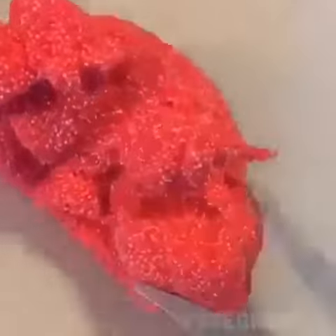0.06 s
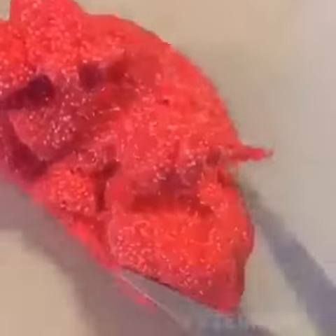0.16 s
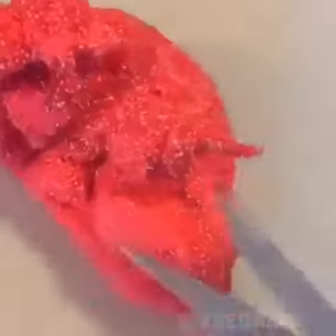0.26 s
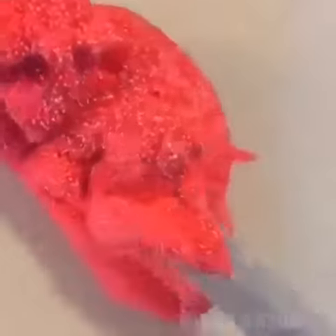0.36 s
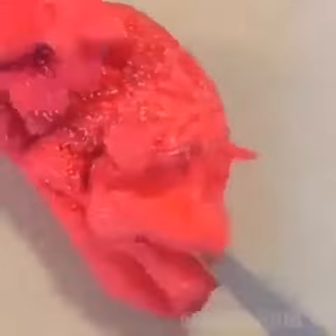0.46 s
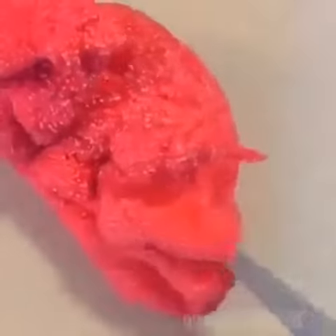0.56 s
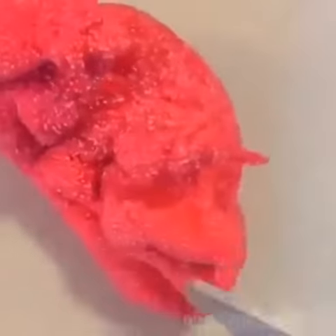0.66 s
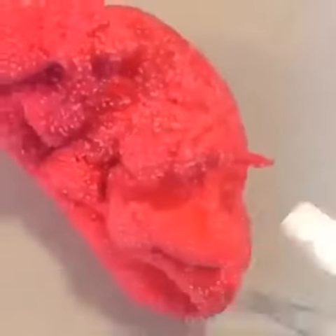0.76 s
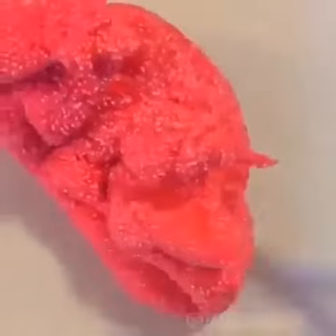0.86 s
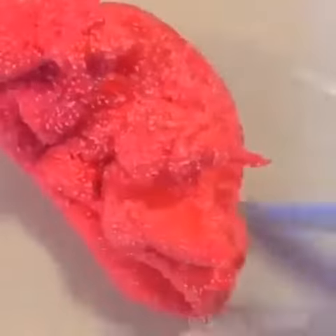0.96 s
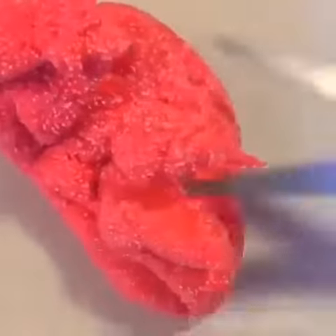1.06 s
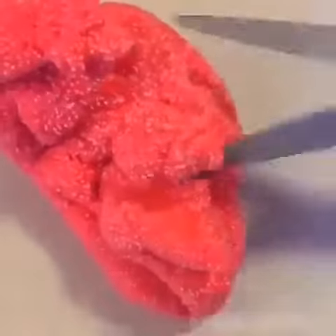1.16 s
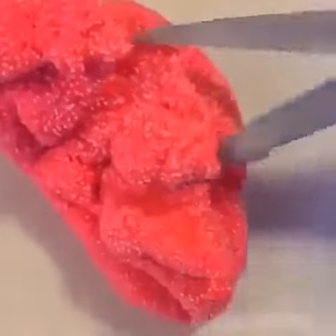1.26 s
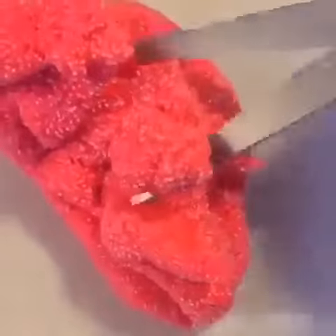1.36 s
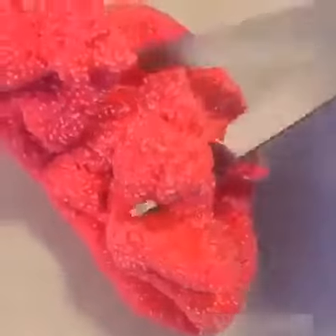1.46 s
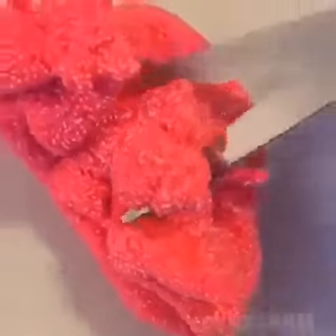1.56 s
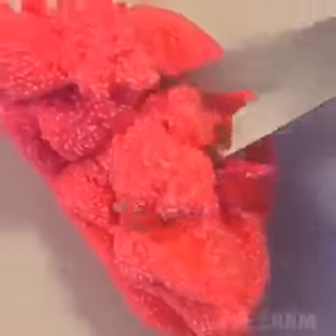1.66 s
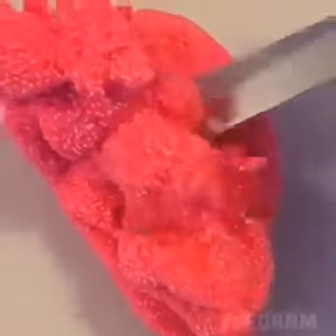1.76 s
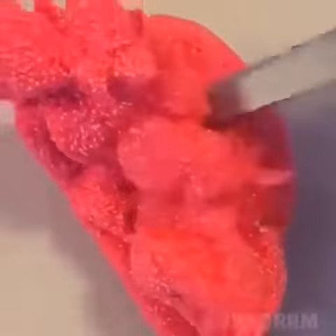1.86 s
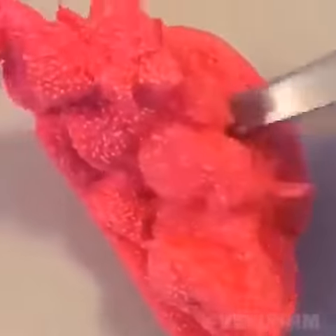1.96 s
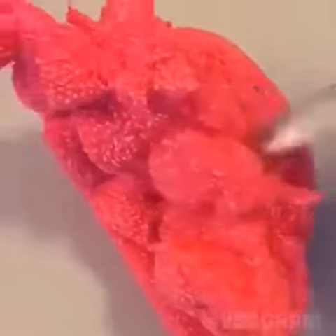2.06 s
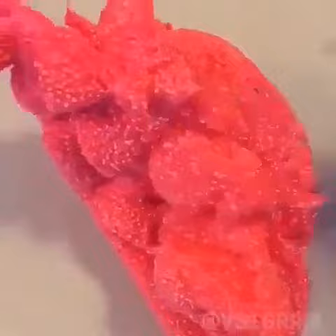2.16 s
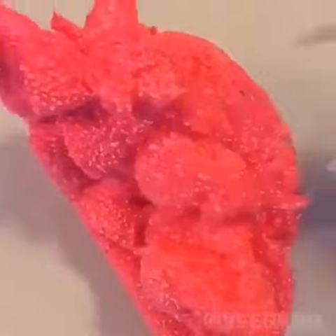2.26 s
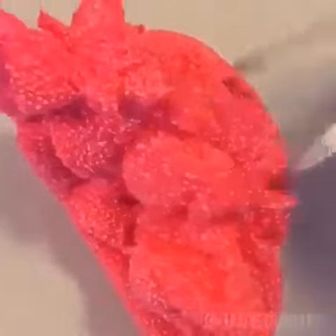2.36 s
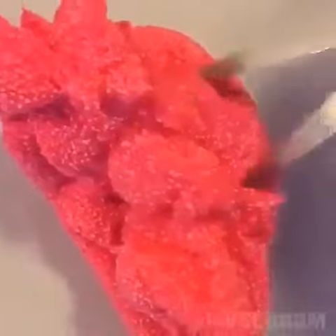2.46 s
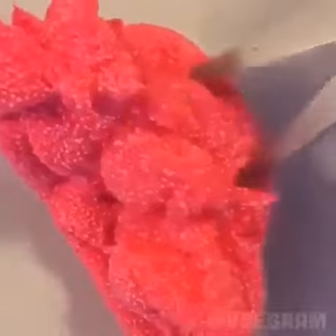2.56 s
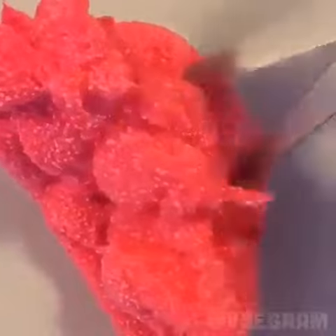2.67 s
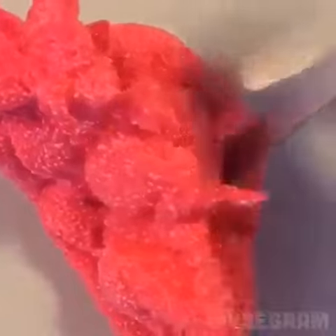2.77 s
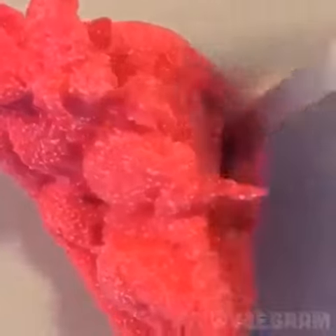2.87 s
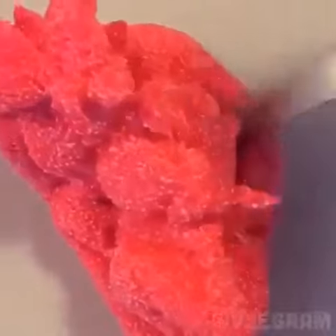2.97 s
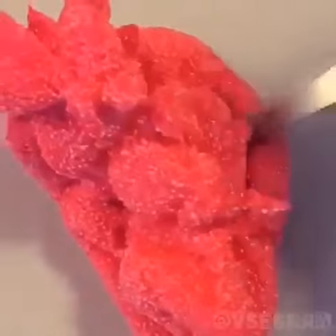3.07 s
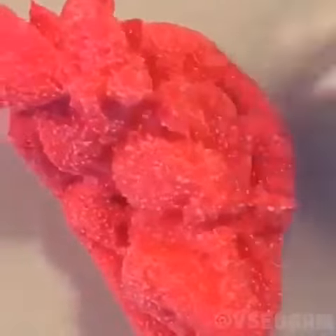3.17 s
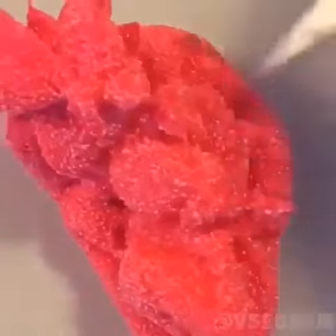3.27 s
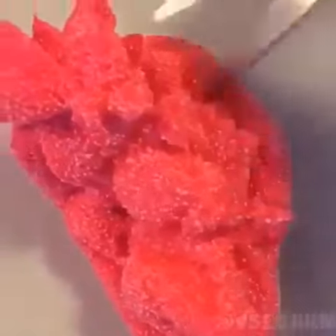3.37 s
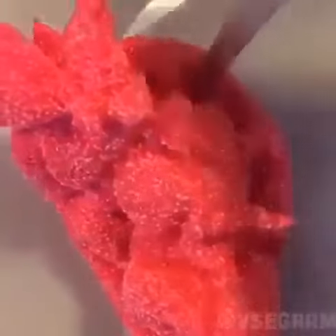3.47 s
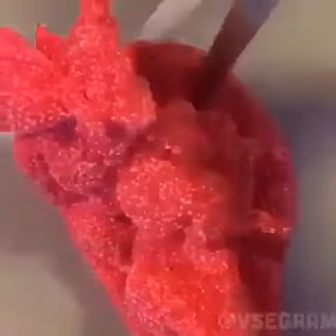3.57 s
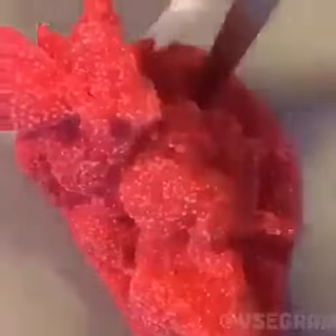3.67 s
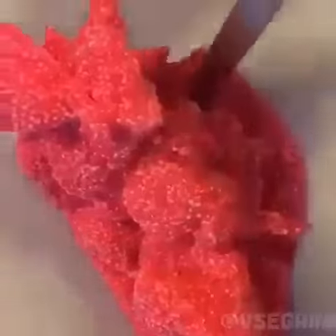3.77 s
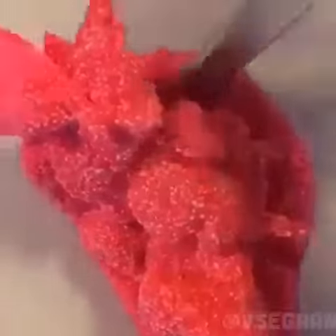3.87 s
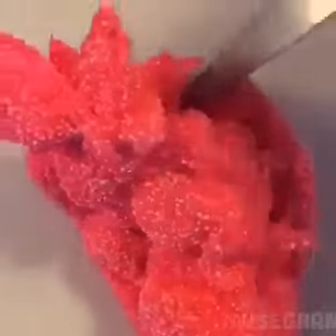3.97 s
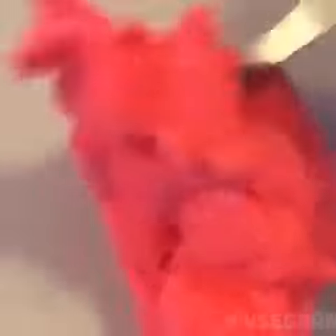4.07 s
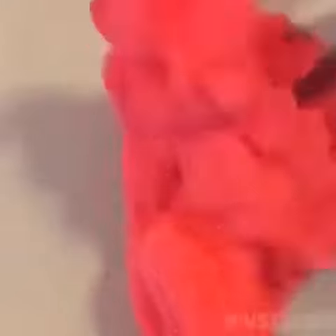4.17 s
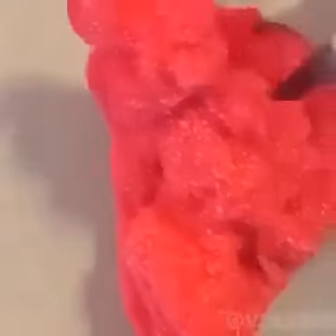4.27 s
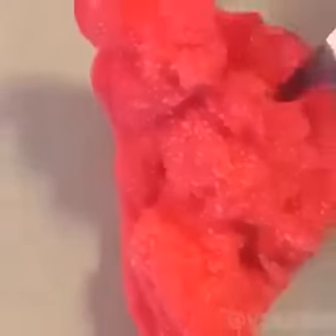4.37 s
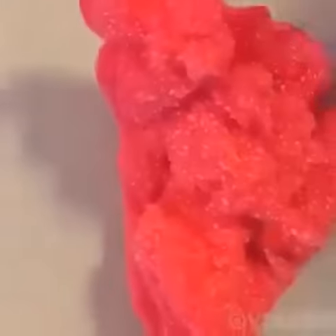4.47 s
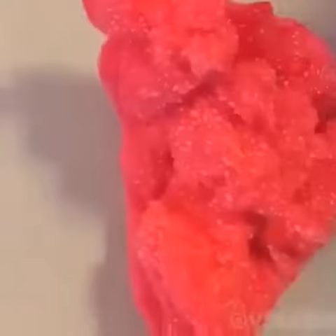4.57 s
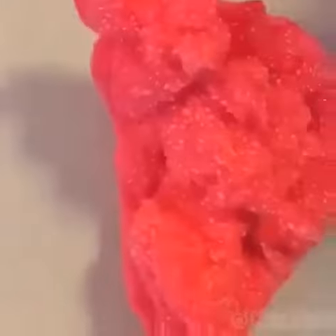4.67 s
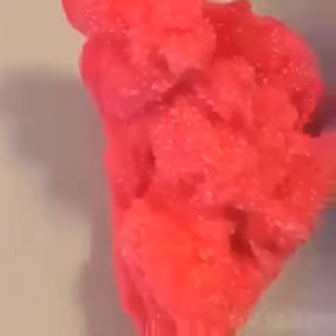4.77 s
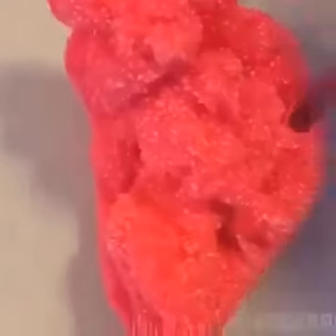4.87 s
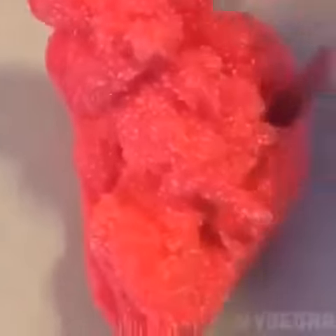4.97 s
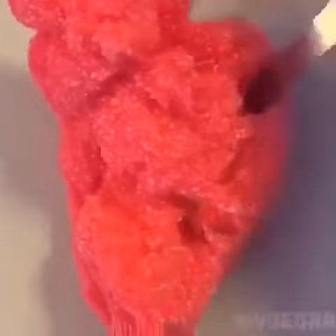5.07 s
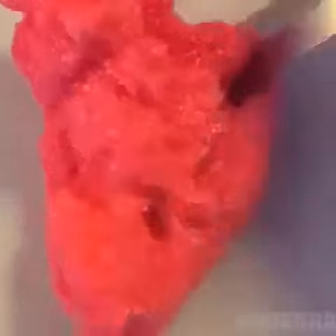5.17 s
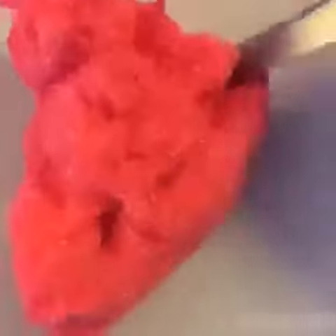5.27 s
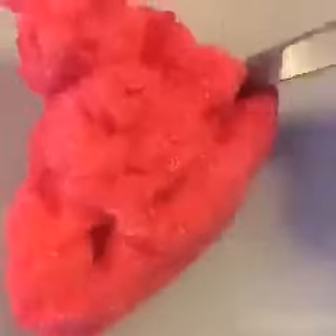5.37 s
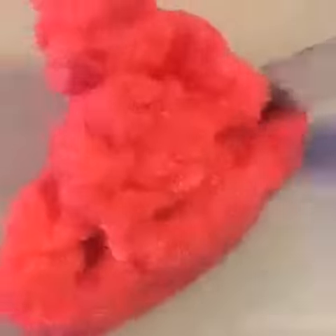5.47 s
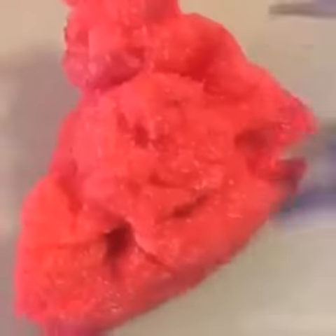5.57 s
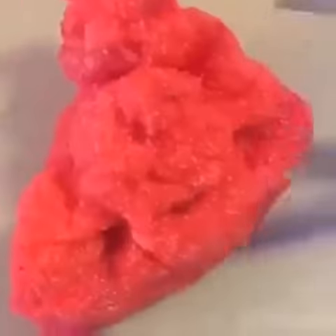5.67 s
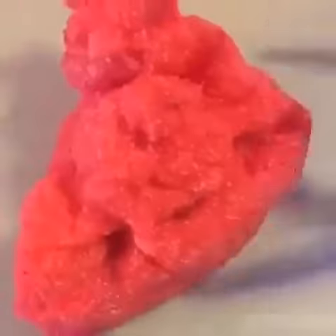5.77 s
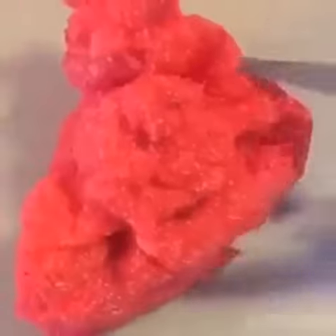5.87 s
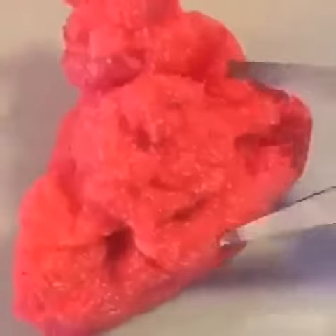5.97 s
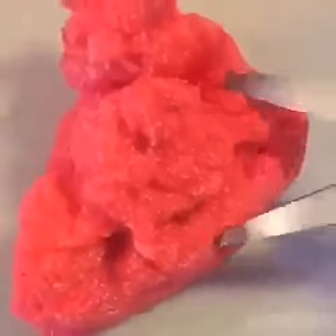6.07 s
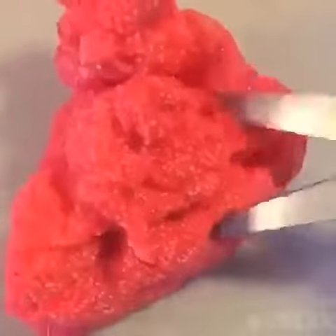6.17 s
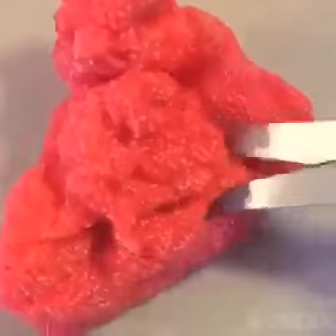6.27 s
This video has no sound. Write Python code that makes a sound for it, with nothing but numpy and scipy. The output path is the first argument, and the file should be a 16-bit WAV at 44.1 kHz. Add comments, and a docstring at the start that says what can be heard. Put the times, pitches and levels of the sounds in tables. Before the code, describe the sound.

Five sharp scissor snips, unevenly spaced over about six seconds, the first two loudest and the last softest. Fine tearing and blade rasp lead into each snap; light scrapes, steel ticks, short clinks on a hard table and dull handling bumps fill the gaps. The microphone is close, the room small with almost no echo, and a quiet low air rumble with faint hum runs throughout.

```python
"""A small room, close to the microphone: metal scissors make five cuts through a soft spongy lump.
Blade rasp is noise made of micro-slips; crushing is thousands of short rings from tearing cells.
Snaps and catches are noise bursts ringing blade resonances; knocks ring the modes of a hard surface.
Ventilation rumble, shaped noise, and a faint hum of three wavering tones run underneath."""
import sys
import numpy as np
from scipy import signal
from scipy.fft import rfft, irfft, next_fast_len
from scipy.io import wavfile
from scipy.ndimage import uniform_filter1d, map_coordinates

SR = 44100
rng = np.random.default_rng(int(sys.argv[2]) if len(sys.argv) > 2 else 0)


def dump_mix(stems):
    """Bounce the given channels to the path in sys.argv[1] as a 16-bit WAV at rate SR."""
    frames = np.atleast_2d(stems).T  # one column per channel
    limited = np.clip(frames, -1, 1)  # hard clip at full scale
    pcm = np.round(limited * 32767).astype(np.int16)
    wavfile.write(sys.argv[1], SR, pcm)


N = 278712
TIME = np.arange(N) / SR  # seconds


def undb(db):
    """Decibels to gain."""
    return 10 ** (np.asarray(db) / 20)


def unit(x):
    """Scale to rms 1."""
    return x / np.sqrt(np.mean(x ** 2))


def peak_unit(x, size=66):
    """Scale a hit so that its loudest stretch of size samples has rms 1."""
    return x / np.sqrt(uniform_filter1d(x ** 2, size).max())


def add(out, start_s, x):
    """Mix x into out at start_s."""
    i = int(start_s * SR)
    out[i:i + len(x)] += x[:N - i]


def colour(x, points):
    """Shape x by a (Hz, dB) spectrum, straight lines over log frequency."""
    hz, db = np.transpose(points)
    f = np.maximum(np.fft.rfftfreq(len(x), 1 / SR), 1)
    gain = undb(np.interp(np.log(f), np.log(hz), db))
    return irfft(rfft(x) * gain, len(x))


def resonate(x, hz, width_hz):
    """One resonance, gain 1 at its centre."""
    return signal.lfilter(*signal.iirpeak(hz, hz / width_hz, fs=SR), x)


def sine(hz, t):
    """Sine wave from phase zero."""
    return np.sin(2 * np.pi * hz * t)


def walk(rate_hz):
    """Slow random curve of rms 1: held random values, smoothed twice."""
    k = int(SR / rate_hz)
    steps = np.repeat(rng.standard_normal(N // k + 1), k)
    smooth = uniform_filter1d(uniform_filter1d(steps, k), k)
    return unit(smooth[:N])


def grains(rate_hz):
    """Tiny random clicks of unequal size, rms 1 overall."""
    sizes = rng.standard_normal(N)
    return unit(sizes * (rng.random(N) < rate_hz / SR))


def pops(low_hz, high_hz, cycles, spread_db, count):
    """Tiny cells tearing: count short rings, each with its own moment, pitch and size; rms 1 overall."""
    out = np.zeros(N)
    for when, pitch, strength, turn in rng.random((count, 4)):
        hz = low_hz * (high_hz / low_hz) ** pitch
        age_cycles = np.arange(int(cycles * SR / hz)) * hz / SR
        decay = np.exp(-np.log(100) * age_cycles / cycles)
        ring = np.sin(2 * np.pi * (age_cycles + turn)) * decay
        add(out, when * N / SR, undb(spread_db * strength) * ring)
    return unit(out)


# Ventilation spectrum. Each row: frequency in Hz, relative density in dB per Hz.
AIR_SPECTRUM = [(15, -47.5), (28, -27), (50, -4.5), (75, -3.5), (100, -5), (135, -4.5), (165, 2), (200, -1),
                (260, -8), (335, -12.5), (440, -22), (800, -28), (1800, -40), (3500, -46), (12000, -47)]


def ventilation(count=72):
    """Rumble of shaped noise, split into narrow bands that swell and sink independently."""
    size = next_fast_len(N)
    air = rfft(colour(rng.standard_normal(size), AIR_SPECTRUM))
    f = np.maximum(np.fft.rfftfreq(size, 1 / SR), 1)
    place = np.interp(np.log(f), np.log([60, 6000]), [0, count - 1])
    sway_db = np.interp(np.arange(count) / count, [.3, .5, .8, 1], [3.4, 4.8, 4.8, 2.5])
    rumble = np.zeros(N)
    for k in range(count):
        band = irfft(air * np.maximum(1 - abs(place - k), 0), size)[:N]
        rumble += band * undb(sway_db[k] * walk(24))
    return undb(-57.5) * unit(rumble)


# Steady tones. Each row: frequency in Hz, rms level in dB before wavering, rms level waver in dB.
HUM_TONES = [(120.2, -63.5, 1.5), (165.8, -70.5, 1.5), (534.5, -86, 5.5)]


def hum():
    """Sines whose level and phase wander slowly."""
    out = np.zeros(N)
    for hz, db, waver_db in HUM_TONES:
        gain = np.sqrt(2) * undb(db + waver_db * walk(12))
        phase = 2 * np.pi * hz * TIME + np.sqrt(hz / 300) * walk(8)
        out += gain * np.sin(phase)
    return out


def background():
    """Ventilation and hum, swelling together."""
    swell_db = 1.88  # rms
    return (ventilation() + hum()) * undb(swell_db * walk(22))


ATTACK_S, SQUEEZE_ATTACK_S = 0.021, 0.06  # the blades sink in gently
RELEASE_TIME_CONSTANT_S = 0.006


def held(start_s, length_s, attack_s):
    """Stroke envelope: linear attack centred on the start, hold, exponential release."""
    attack = np.clip((TIME - start_s) / attack_s + .5, 0, 1)
    overtime_s = np.maximum(TIME - start_s - length_s, 0)
    return attack * np.exp(-overtime_s / RELEASE_TIME_CONSTANT_S)


def fade(age_s, db_per_s):
    """Gain that falls steadily in dB once age is above zero."""
    return undb(-db_per_s * np.maximum(age_s, 0))


# Rasp dB is total rasp; brightness is bright rasp over dull rasp.
REST_RASP_DB, REST_BRIGHT_DB, REST_CRUSH_DB = -88.5, -3.5, -84  # scissors never quite still in the hand
SQUEEZE_RISE_DB_PER_S, SLIDE_FADE_DB_PER_S = 46.5, 186  # hand presses harder; blades slow after the snap
RUSH_DB, RUSH_RISE_DB_PER_S, RUSH_BRIGHT_DB = -47.5, 559, 5.5  # edges speed up as the lump gives way
SLIDE_CRUSH_DB, OPEN_CRUSH_DB = -14, -9.5  # crushing relative to rasp
# Cut faces peeling off the shut blades.
SETTLE_DB, SETTLE_FADE_DB_PER_S, SETTLE_BRIGHT_DB, SETTLE_CRUSH_DB = -71, 71.5, 0, -73
OPEN_SAG_DB_PER_S = 35
# Closing stroke around each snap, in snap order. Each row: squeeze length before the snap in seconds,
# its rasp in dB, brightness in dB, crushing in dB, slide length after it in seconds, its rasp in dB,
# brightness in dB.
CLOSING_STROKES = [(0.47, -72.5, 3.5, -78, 0.092, -49, 4), (0.16, -59.5, 3.5, -64, 0.2, -48.5, 8),
                   (0.2, -59, 5, -60, 0.071, -52.5, 9), (0.16, -65.5, 3, -62, 0.033, -57, -2),
                   (0.32, -62, 4.5, -63, 0.03, -49, -4)]
# Blades scraping open. Each row: start in seconds, length in seconds, rasp in dB, brightness in dB.
OPENING_STROKES = [(0.739, 0.082, -62.5, 8.5), (2.088, 0.084, -64, 10), (3.126, 0.04, -66, 10),
                   (3.173, 0.031, -64.5, 4), (4.144, 0.087, -60, -1), (5.472, 0.086, -63, 1.5)]
# Blades pushing into the lump or dragging out. Each row: middle in seconds, half-power width in seconds,
# rasp in dB, brightness in dB, crushing in dB.
DRAG_SWELLS = [(0.051, 0.046, -76, 4, -93), (0.334, 0.071, -71.5, 11, -72.5), (.905, 0.069, -75.5, -4, -72),
               (1.469, 0.047, -73.5, -1, -75), (1.531, 0.041, -68.5, 4, -73), (1.631, 0.042, -77, 3, -78),
               (1.735, 0.028, -59.5, 8.5, -69), (2.625, 0.057, -69, 0, -60.5),
               (2.774, 0.038, -69.5, 16, -68), (3.824, 0.047, -62.5, -10.5, -68.5),
               (3.985, 0.083, -68, 1.5, -86), (4.041, 0.03, -60, 6, -61.5), (4.121, 0.024, -61.5, 2, -72),
               (6.218, 0.043, -66, 0, -72), (6.275, 0.062, -57.5, 10, -68.5)]


def movements():
    """Every move of the blades, as (envelope, rasp dB, brightness dB, crushing dB)."""
    yield np.ones(N), REST_RASP_DB, REST_BRIGHT_DB, REST_CRUSH_DB
    for (snap_s, *_), closing in zip(SNAP_EVENTS, CLOSING_STROKES):
        squeeze_s, squeeze_db, squeeze_bright_db, crush_db, slide_s, slide_db, slide_bright_db = closing
        before_s, after_s = snap_s - TIME, TIME - snap_s
        squeeze = held(snap_s - squeeze_s, squeeze_s, SQUEEZE_ATTACK_S)
        squeeze = squeeze * fade(before_s, SQUEEZE_RISE_DB_PER_S)
        yield squeeze, squeeze_db, squeeze_bright_db, crush_db
        rush = (TIME < snap_s) * fade(before_s, RUSH_RISE_DB_PER_S)
        yield rush, RUSH_DB, RUSH_BRIGHT_DB, RUSH_DB + SLIDE_CRUSH_DB
        slide = held(snap_s, slide_s, ATTACK_S) * fade(after_s, SLIDE_FADE_DB_PER_S)
        yield slide, slide_db, slide_bright_db, slide_db + SLIDE_CRUSH_DB
        settle = (TIME > snap_s) * fade(after_s, SETTLE_FADE_DB_PER_S)
        yield settle, SETTLE_DB, SETTLE_BRIGHT_DB, SETTLE_CRUSH_DB
    for start_s, length_s, db, bright_db in OPENING_STROKES:
        scrape = held(start_s, length_s, ATTACK_S) * fade(TIME - start_s, OPEN_SAG_DB_PER_S)
        yield scrape, db, bright_db, db + OPEN_CRUSH_DB
    for middle_s, width_s, db, bright_db, crush_db in DRAG_SWELLS:
        yield 1 / (1 + (abs(TIME - middle_s) / width_s * 1.56) ** 3), db, bright_db, crush_db


def effort():
    """Gains over time of dull rasp, bright rasp and crushing; the moves add in power."""
    power = np.zeros((3, N))
    for envelope, db, bright_db, crush_db in movements():
        dull = undb(db) / np.hypot(1, undb(bright_db))
        gains = [dull, dull * undb(bright_db), undb(crush_db)]
        power += np.outer(np.square(gains), envelope ** 2)
    return np.sqrt(power)


# Blade resonances. Each row: frequency in Hz, width in Hz, gain in dB.
BLADE_MODES = [(853, 150, -6), (1379, 220, -10), (1830, 140, -14.5), (2560, 220, -4.5), (3010, 160, 2),
               (4020, 590, 0), (5070, 200, -1), (5880, 190, -1), (7200, 620, 1), (8050, 300, -0.5),
               (8907, 310, 1), (9560, 200, -0.5), (10900, 260, -7), (10700, 200, -6.5)]


def ring_blades(x):
    """Both blades as parallel resonances, damped by the hand and the lump."""
    return sum(undb(db) * resonate(x, hz, width_hz) for hz, width_hz, db in BLADE_MODES)


# Spectra of dull rasp, bright rasp and crushing. Each row: frequency in Hz, relative density in dB per Hz.
DULL_SPECTRUM = [(1200, -31), (2000, -4), (2900, -4), (4000, 2), (5300, 1.5), (6500, -7), (9000, -33)]
BRIGHT_SPECTRUM = [(4000, -34), (6000, -6), (7300, -5), (8900, -1.5), (10300, -2.5), (12000, -2.5)]
CRUSH_SPECTRUM = [(200, -10.5), (450, 0.5), (800, -1), (1300, 1.5), (2000, 3), (3200, -22), (6000, -35.5)]


def rasp(dull_gain, bright_gain):
    """Edge slides on edge in dense micro-slips, with cells crackling and popping against the blades."""
    slips = grains(12000) * undb(3 * walk(120))
    crackle = pops(low_hz=1995, high_hz=11880, cycles=86, spread_db=16.0, count=10000)
    edge = slips + undb(-12.0) * unit(ring_blades(slips)) + undb(0.5) * crackle
    dull = dull_gain * unit(colour(edge, DULL_SPECTRUM))
    bright = bright_gain * unit(colour(edge, BRIGHT_SPECTRUM))
    crisp = undb(-12) * pops(low_hz=2406, high_hz=6550, cycles=120, spread_db=11, count=900)
    return dull + bright + np.hypot(dull_gain, bright_gain) * crisp


def crushing(crush_gain):
    """The lump tears unevenly: many small cells, and bigger ones bursting one by one."""
    tear_db, tears_hz = 4.5, 46
    fine = pops(low_hz=389.8, high_hz=3368, cycles=51, spread_db=11.5, count=9000)
    fine = unit(colour(fine, CRUSH_SPECTRUM))
    coarse = undb(-6) * pops(low_hz=792, high_hz=3610, cycles=52, spread_db=14.5, count=1300)
    return crush_gain * (unit(fine * undb(tear_db * walk(tears_hz))) + coarse)


def flakes():
    """Crumbs of the lump shift: faint short rings scattered throughout."""
    return undb(-88) * pops(low_hz=702, high_hz=3300, cycles=110, spread_db=10, count=160)


# Rubbing that makes one resonance of a blade or the surface sing. Each row: middle in seconds,
# Gaussian sigma in seconds, frequency in Hz, bandwidth of each of two filter passes in Hz, level in dB.
RUB_EVENTS = [(0.058, 0.017, 5400, 420, -69), (0.764, 0.012, 7260, 1900, -59),
              (0.778, 0.0055, 2330, 450, -67), (0.803, 0.011, 1710, 450, -59.5),
              (0.804, .011, 2860, 1100, -66), (0.851, 0.012, 3110, 90, -67.5),
              (1.55, 0.024, 1730, 500, -71), (1.706, 0.0098, 3120, 313, -70),
              (2.615, .014, 1510, 1200, -66), (2.642, 0.021, 2450, 330, -63.5),
              (2.724, 0.009, 326, 200, -59.5), (2.722, 0.019, 1520, 900, -69.5),
              (2.772, 0.014, 2400, 1100, -55.5), (3.818, 0.019, 3250, 700, -63),
              (3.828, 0.021, 730, 160, -63), (4.05, 0.0078, 1430, 453, -61.5),
              (4.045, .014, 3900, 2000, -63.5), (4.171, .004, 3060, 500, -57.5),
              (4.186, 0.011, 3550, 450, -62), (5.22, 0.046, 3500, 1900, -61.5),
              (5.25, 0.035, 1200, 1200, -69), (5.497, 0.014, 7600, 2000, -62.5),
              (6.262, 0.0065, 2994, 896, -66), (6.3, 0.014, 3180, 120, -70)]


def rubs():
    """Quick micro-slips feed one resonance for a moment; its pitch wanders with the contact."""
    slips_hz = 2300
    out = np.zeros(N)
    place = np.cumsum(1 + .003 * walk(45))  # wandering read position, samples
    for middle_s, sigma_s, hz, band_hz, db in RUB_EVENTS:
        ring = resonate(resonate(grains(slips_hz), hz, band_hz), hz, band_hz)
        ring = map_coordinates(ring, [place], order=3, mode="mirror") * undb(2.7 * walk(110))
        swell = np.exp(-.5 * ((TIME - middle_s) / sigma_s) ** 2)
        out += undb(db) * peak_unit(ring * swell, size=882)
    return out


# Soft low bumps of handling. Each row: start in seconds, level in dB, frequency in Hz,
# decay time constant in seconds.
BUMP_EVENTS = [(0.091, -54.5, 181.2, 0.027), (1.12, -56, 130, 0.016), (2.695, -49.5, 173.5, 0.019),
               (3.79, -53, 161.8, 0.053), (3.962, -49.5, 167, 0.019), (4.761, -54.5, 175.6, 0.022),
               (5.545, -50.5, 123.5, 0.011), (6.002, -56, 173, 0.017)]


def bumps():
    """The lump and the hand bump dully on the table: low sines with a soft onset."""
    attack_s = 0.0091
    out = np.zeros(N)
    t = TIME[:SR // 3]
    for start_s, db, hz, decay_s in BUMP_EVENTS:
        thud = sine(hz, t) * np.exp(-t / decay_s) * (1 - np.exp(-t / attack_s))
        add(out, start_s, undb(db) * peak_unit(thud, size=441))
    return out


# Surface modes. Each row: frequency in Hz, gain in dB, t60 in seconds before a knock's length share.
SURFACE_MODES = [(674, -10, .12), (822, -1.5, .25), (895, 8.5, 0.35), (1020, -3.5, .2), (1260, 3, 0.32),
                 (1373, -0.5, .26), (1670, -0.5, 0.15), (1780, 0.5, 0.17), (1920, -3, 0.2),
                 (2230, -2.5, .14), (2360, -1, .3), (2440, -0.5, 0.1), (2730, 0, 0.11), (2980, -2.5, 0.12),
                 (3302, -1, 0.17), (3640, -5, 0.1)]
# Knocks on the surface. Each row: start in seconds, reference level in dB, Hz that the contact favours,
# its spread in octaves, ring length as a share of t60.
KNOCK_EVENTS = [(0.238, -60, 1900, 0.58, 0.29), (0.396, -59, 1284, 0.43, 0.3),
                (0.789, -54, 830, 0.07, 0.34), (0.797, -44, 870, 0.079, 0.49),
                (0.794, -55.5, 1660, 0.28, 0.84), (0.805, -54, 1420, 0.051, 0.54),
                (0.795, -57.5, 2920, 0.35, 0.93), (1.4502, -61, 950, 0.3, 0.3),
                (1.469, -67, 1410, 0.13, 0.35), (1.534, -61.5, 1530, 0.16, .3),
                (2.045, -61.5, 3100, 0.099, 0.62), (2.189, -54, 1706, 0.87, 0.56),
                (2.593, -43, 1323, 0.13, 0.56), (2.595, -46.5, 1760, 0.092, 0.85),
                (2.593, -45, 2600, 0.26, .25), (2.616, -55, 2380, .06, .6),
                (2.7527, -42.5, 2430, 0.97, 0.28), (2.763, -56, 1020, 0.21, .4),
                (2.871, -47.5, 1400, 0.9, 0.16), (3.825, -52.5, 3410, .15, .2),
                (3.8532, -49.5, 1475, 0.28, 0.15), (4.039, -53.5, 1330, .2, 0.32),
                (5.528, -58, 2300, 0.74, .12), (5.54, -60, 1590, 0.33, 0.11)]


def knocks(size=16384):
    """The hard surface clinks when the work bumps it; the contact decides which modes answer."""
    ring_db, scuff_db = -1.5, -8  # relative to the reference level
    out, t = np.zeros(N), np.arange(size) / SR
    hz, mode_db, t60_s = np.transpose(SURFACE_MODES)[:, :, None]
    for start_s, db, centre_hz, spread, length in KNOCK_EVENTS:
        weight = undb(mode_db) / (1 + (np.log2(hz / centre_hz) / spread) ** 4)
        # every mode is a close pair that beats, and wavers as the load on the surface shifts
        waver = np.cumsum(rng.standard_normal((len(hz), size)), axis=1) * .005
        phase = 2 * np.pi * (hz * t + rng.random(hz.shape) + waver)
        twin = phase + 2 * np.pi * rng.uniform(21, 77, hz.shape) * t
        pairs = np.sin(phase) + 0.6 * np.sin(twin)
        ring = np.sum(weight * pairs * undb(-60 * t / (t60_s * length)), axis=0)
        ring = ring * (1 - np.exp(-t / .0012))
        scuff_decay = np.exp(-t / 0.0018) + undb(-3.0) * np.exp(-t / (0.024 * length))
        scuff = rng.standard_normal(size) * scuff_decay
        for _ in range(3):
            scuff = resonate(scuff, centre_hz, centre_hz * spread * 1.3)
        hit = undb(ring_db) * peak_unit(ring) + undb(scuff_db) * peak_unit(scuff)
        add(out, start_s, undb(db) * hit)
    return out


CONTACT_LEAD_S = .0014  # build-up of a contact before its peak
# Force of a steel contact. Each row: frequency in Hz, relative density in dB per Hz.
CONTACT_SPECTRUM = [(150, -15), (450, -5.5), (800, -4.5), (1350, -7.5), (1900, -4.5), (2500, -1), (3300, 2),
                    (6500, 1.5), (12000, -1)]


def click(rings, contact_s, dry_db, size=2048):
    """Steel meets steel: short broadband chatter rings the blades; contact place favours rings (Hz, dB)."""
    t = np.arange(size) / SR
    burst = rfft(rng.standard_normal(size) * np.exp(-t / contact_s))
    # a hard contact holds every frequency about equally
    burst_power = abs(burst) ** 2
    chatter = irfft(burst / np.sqrt(burst_power + .1 * np.mean(burst_power)), size)
    chatter = np.roll(colour(chatter, CONTACT_SPECTRUM), int(CONTACT_LEAD_S * SR))
    chatter = peak_unit(chatter * np.exp(-(t / .012) ** 2))
    out = undb(-1.5) * peak_unit(ring_blades(chatter)) + undb(dry_db) * chatter
    for hz, db in rings:
        out = out + undb(db) * peak_unit(resonate(chatter, hz, width_hz=350))
    return peak_unit(out)


# Edges catching hard and slipping. Each row: time in seconds, reference level in dB (2.5 above the click),
# ring in Hz, contact decay in seconds.
CATCH_EVENTS = [(0.32, -55, 4240, 0.002), (0.4555, -36.5, 6400, 0.00085), (0.4644, -30, 6000, .001),
                (0.483, -45, 4570, 0.0018), (0.744, -58.5, 3100, .002), (0.7593, -56, 6900, .002),
                (0.768, -61, 3900, .002), (0.78, -57, 4150, .002), (1.48, -68, 3600, 0.00086),
                (1.518, -66, 4050, .002), (1.548, -60, 2400, .001), (1.629, -65, 2880, .001),
                (1.735, -44.5, 3720, 0.001), (1.8175, -41.5, 3100, 0.0025), (1.8248, -30.5, 3160, 0.0012),
                (1.8295, -29, 3770, 0.00058), (1.841, -36, 3308, .001), (2.095, -59, 5120, 0.0019),
                (2.9134, -39, 7150, 0.002), (2.924, -45, 3180, 0.0018), (2.942, -45, 4840, 0.0033),
                (3.1375, -56, 5450, .002), (3.1491, -51.5, 7900, 0.0026), (3.1815, -52.5, 5380, 0.0022),
                (3.8774, -39.5, 9180, 0.00087), (3.8988, -41.5, 5500, 0.0039),
                (3.9117, -24.5, 4820, 0.00056), (3.929, -47, 4100, 0.0023), (4.032, -57, 2300, .002),
                (4.121, -54, 5500, 0.0018), (4.1717, -48, 3000, 0.002), (4.198, -56, 3600, .0015),
                (4.2219, -49.5, 4070, 0.0027), (5.1380, -49, 3930, 0.0015), (5.1573, -50.5, 6750, 0.00064),
                (5.1712, -44, 3800, 0.00095), (5.219, -59, 3920, .0015), (5.2797, -43, 8300, .0012),
                (5.2964, -36.5, 4360, 0.0013), (5.452, -55.5, 2620, 0.0024), (5.511, -59.5, 3700, .001),
                (5.547, -57.5, 2980, 0.0023)]
# Light catches: least level over the rasp, range above it, ring range.
TICK_DB, TICK_SPREAD_DB, TICK_LOW_HZ, TICK_HIGH_HZ = -1, 3.5, 1898, 6900


def catches(rasp_gain, count=200):
    """Ticks where the edges stick and let go: hard ones, and light random ones as loud as the rasp allows."""
    out = np.zeros(N)
    for at_s, db, ring_hz, contact_s in CATCH_EVENTS:
        tick = click([(ring_hz, -2)], contact_s, dry_db=-2.5)
        add(out, at_s - CONTACT_LEAD_S, undb(db - 2.5) * tick)
    for when, strength, place in rng.random((count, 3)):
        gain = rasp_gain[int(when * N)] * undb(TICK_DB + TICK_SPREAD_DB * strength)
        ring_hz = TICK_LOW_HZ * (TICK_HIGH_HZ / TICK_LOW_HZ) ** place
        add(out, when * N / SR, gain * click([(ring_hz, -2)], contact_s=0.002, dry_db=-4.5))
    return out


# Last of the lump tearing, in snap order. Each row: level in dB, build-up time constant in seconds.
PARTING_RIPS = [(-44.5, 0.0018), (-41.5, .003), (-39.5, 0.0045), (-39.5, 0.0062), (-44, 0.0036)]


def partings(size=1024):
    """The last bridge of the lump rips with a dull, growing crunch that ends in the snap."""
    out, age_s = np.zeros(N), np.arange(size) / SR
    for (snap_s, *_), (db, build_s) in zip(SNAP_EVENTS, PARTING_RIPS):
        rip = colour(rng.standard_normal(size), CRUSH_SPECTRUM) * np.exp(-age_s / build_s)[::-1]
        add(out, snap_s - size / SR + CONTACT_LEAD_S, undb(db) * peak_unit(rip))
    return out


# Blades snapping shut. Each row: time in seconds, reference level in dB, hollow body in Hz, its level in dB
# over the reference, treble tilt in dB per octave, lag of the handles in seconds, slap in dB, thump in dB,
# thump in Hz.
SNAP_EVENTS = [(0.466, -18.5, 923, -14, -1.5, 0.0021, -50, -49, 128.7),
               (1.8366, -18.5, 780, -7.5, -0.5, 0.0053, -44.5, -33.5, 147.1),
               (2.93, -23.5, 700, -13.5, -2.5, .004, -48, -39, 131.4),
               (3.9126, -22.5, 751, -18.5, 0, .0027, -31, -33.5, 138.7),
               (5.285, -26.5, 1100, -8.5, -1, 0.0026, -45, -38, 119.4)]
# Rings favoured by where the edges meet, one list a snap. Each row: frequency in Hz, gain in dB.
SNAP_RING_LISTS = [
    [(1230, -12), (2450, -11.5), (2880, -9.5), (3900, -9.5), (6020, 2.5), (7550, -9), (8900, -1.5)],
    [(2880, -7), (3930, -2), (7330, -7), (9680, -4)],
    [(2960, -12.5), (4970, 0), (7240, -4), (9050, 1.5)],
    [(2480, -6.5), (4150, -5.5), (4980, -2.5), (6950, -8), (7930, -4.5), (11550, -1)],
    [(1150, -13), (2300, -11), (3830, -6), (5310, -6), (8500, -6), (9750, -8)],
]


def handles(slap_db, thump_db, thump_hz, t):
    """The handles meet against the fingers: a short slap, a low boom and a rattle of filtered noise."""
    slap_hz, slap_decay_s = 208, 0.003
    slap = sine(slap_hz, t) * np.exp(-t / slap_decay_s)
    boom = sine(thump_hz, t) * np.exp(-t / .016) * (1 - np.exp(-t / 0.003))
    rattle = rng.standard_normal(len(t)) * np.exp(-t / 0.008)
    for _ in range(2):
        rattle = resonate(rattle, hz=290.0, width_hz=230)
    return undb(slap_db) * slap + undb(thump_db) * (boom + undb(-9.5) * peak_unit(rattle))


def snaps(size=8192, lead_size=512):
    """Each cut speeds up into a crack of the blades and a hollow tock; then the handles slap and thump."""
    out, t = np.zeros(N), np.arange(size) / SR
    octaves = np.log2(np.maximum(np.fft.rfftfreq(size, 1 / SR), 500) / 5000)
    for event, rings in zip(SNAP_EVENTS, SNAP_RING_LISTS):
        snap_s, db, body_hz, body_db, tilt_db, lag_s, slap_db, thump_db, thump_hz = event
        crack = click(rings, contact_s=.001, dry_db=-9)
        crack = irfft(rfft(crack, size) * undb(tilt_db * octaves))[:size // 2]
        add(out, snap_s - CONTACT_LEAD_S, undb(db - 1.5) * peak_unit(crack))
        # the lump gives way and the edges run together ever faster
        run = unit(ring_blades(rng.standard_normal(lead_size)))
        run = run * np.exp(-t[:lead_size] / 0.0049)[::-1]
        add(out, snap_s - lead_size / SR, undb(db - 20) * run)
        tock = sine(body_hz, t) * np.exp(-t * body_hz)  # time constant: one cycle
        add(out, snap_s, undb(db + body_db) * tock)
        add(out, snap_s + lag_s, handles(slap_db, thump_db, thump_hz, t))
    # the scissors are too small to give off deeper bass
    bass_cut = signal.butter(2, 75, "high", fs=SR, output="sos")
    return signal.sosfilt(bass_cut, out)


# Lightly damped rings of the free blade tips. Each row: frequency in Hz, width in Hz, gain in dB.
TIP_MODES = [(2620, 30, -11), (2940, 31, -8), (3264, 31, 0), (3640, 35, -7), (4020, 19, -9),
             (4980, 17, -7.5), (6570, 220, -4.5), (8440, 30, -4), (8900, 57, -7)]


def tips(steel):
    """Whatever shakes the blades makes their free tips sing."""
    return sum(undb(db) * resonate(steel, hz, width_hz) for hz, width_hz, db in TIP_MODES)


def room(x, t60_s, wet_db, size=22050):
    """A small room: a diffuse noise tail that starts a few milliseconds late."""
    t = np.arange(size) / SR
    onset = np.clip(t / 0.0064 - 1, 0, 1)
    tail = rng.standard_normal(size) * undb(-60 * t / t60_s) * onset
    return x + undb(wet_db) * signal.fftconvolve(x, tail / np.linalg.norm(tail))[:N]


def scene():
    """Scissors, lump and surface in the room, over bumps and background."""
    dull, bright, crush = effort()
    steel = snaps() + partings() + catches(np.hypot(dull, bright))
    steel = steel + rasp(dull, bright) + crushing(crush)
    close = steel + tips(steel) + knocks() + rubs() + flakes()
    return (room(close, t60_s=0.056, wet_db=-23.5) + bumps() + background())[None]


def record(dry):
    """The recorder cuts the top steeply."""
    top_hz = 12250
    return signal.sosfilt(signal.ellip(10, .2, 70, top_hz, fs=SR, output="sos"), dry)


dry = scene()
out = record(dry)
dump_mix(out)
```